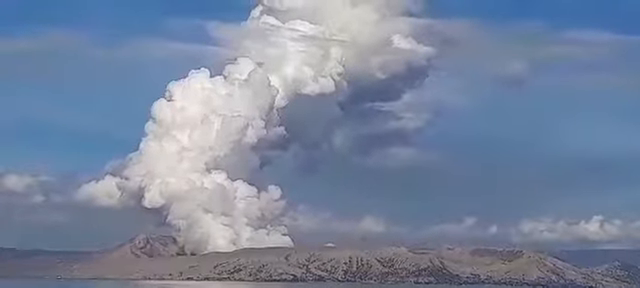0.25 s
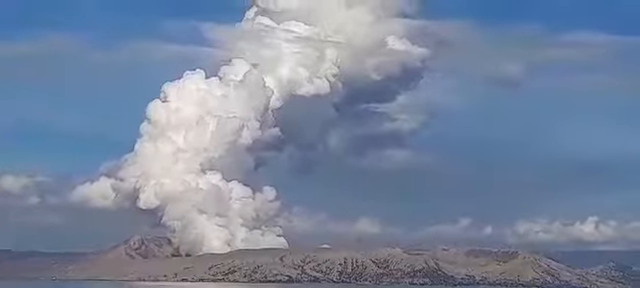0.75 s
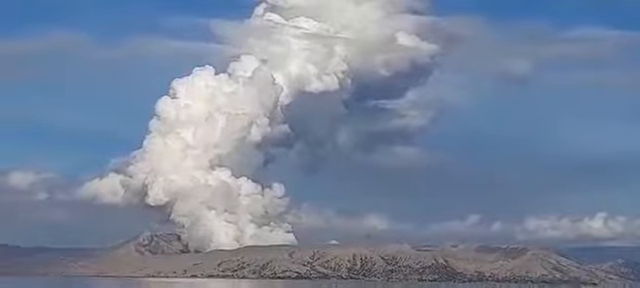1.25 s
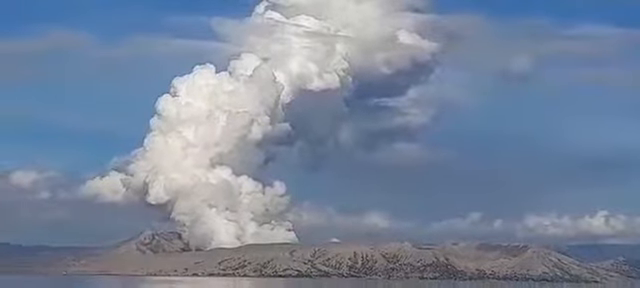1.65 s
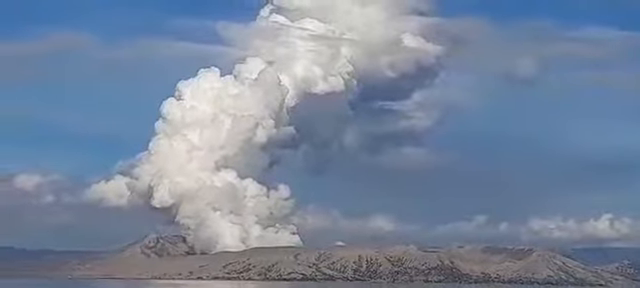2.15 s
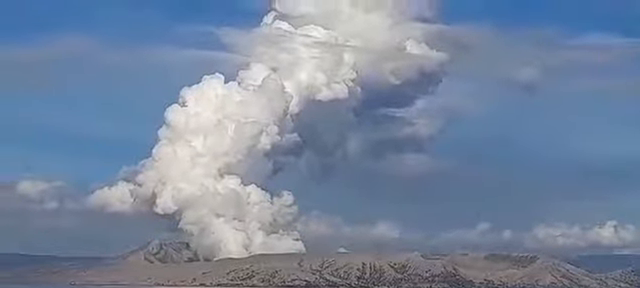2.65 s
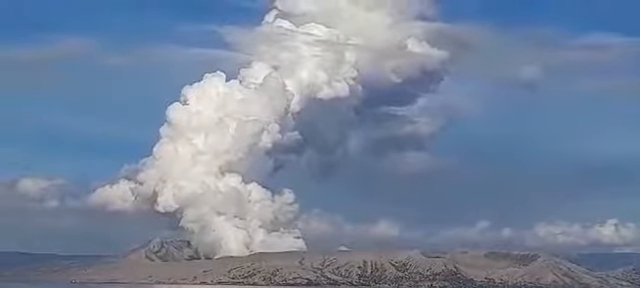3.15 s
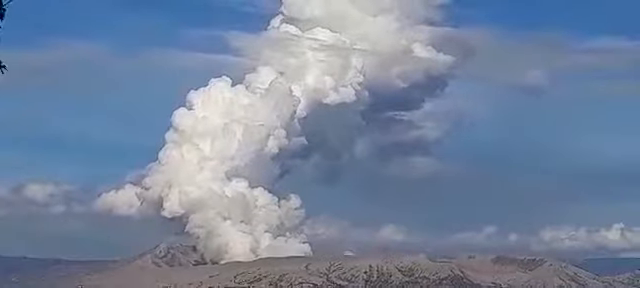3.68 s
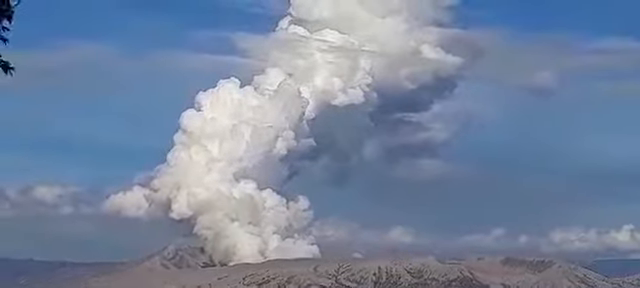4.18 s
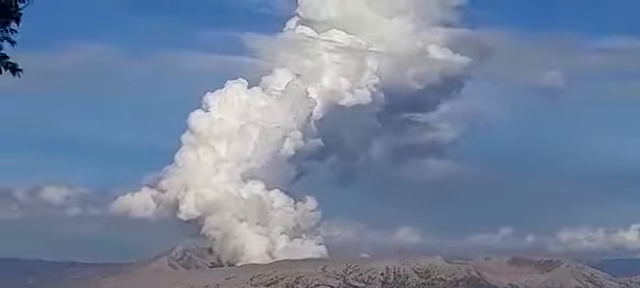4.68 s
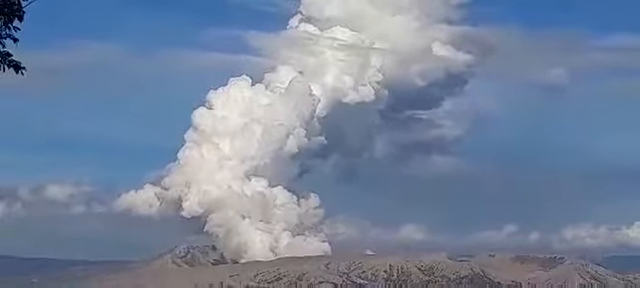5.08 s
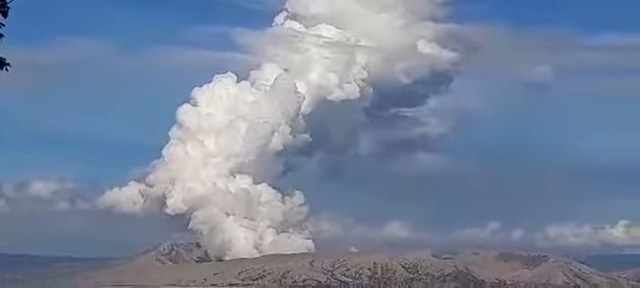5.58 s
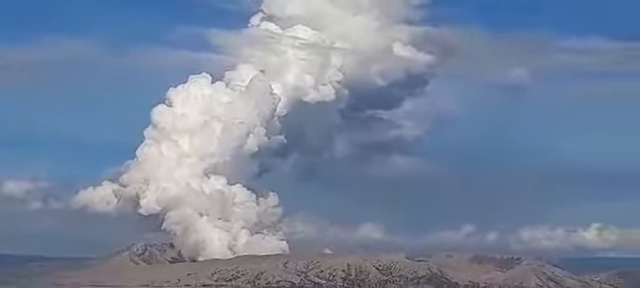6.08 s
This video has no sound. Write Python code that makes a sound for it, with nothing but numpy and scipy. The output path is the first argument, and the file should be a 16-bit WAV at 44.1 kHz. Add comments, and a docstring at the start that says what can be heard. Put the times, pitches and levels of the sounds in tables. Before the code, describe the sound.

Open outdoor place with a constant low rumble, faint hum and thin airy hiss. A small bird close to a stereo microphone gives five loud, sharp chirps, a little over a second apart, each flicking up and plunging into a rasp. Soft high ticks run between them, and distant birds whistle faintly through echoes. Two tiny snaps come early; duller, hoarser calls answer from afar later.

```python
"""A low outdoor rumble, a faint hum and a thin hiss of air run throughout, with runs of soft high ticks over them.
Far birds whistle, and a small bird near the stereo microphone gives five sharp chirps.
There are also two faint snaps and, farther away, duller rasping calls.
Bird voices are swept tones: harmonic stacks through a throat for the chirps and rasps, thin tones for
ticks and whistles, all scattered by echoes. Rumble, air and snaps are shaped noise; the hum is sines."""
import sys
import numpy as np
from scipy import signal
from scipy.fft import rfft, irfft, next_fast_len
from scipy.io import wavfile
from scipy.ndimage import map_coordinates

SR = 44100
rng = np.random.default_rng(int(sys.argv[2]) if len(sys.argv) > 2 else 0)


def materialize(psi):
    """Save the field psi as 16-bit PCM at rate SR to the path in sys.argv[1].

    A 1-D psi becomes a single channel; in a 2-D psi each row is a channel.
    """
    bounded = np.clip(np.atleast_2d(psi).T, -1, 1)
    quanta = np.round(bounded * 32767).astype(np.int16)
    wavfile.write(sys.argv[1], SR, quanta)


N = 279153  # samples

# Spectrum of the low rumble. Each row: frequency in Hz, relative density in dB per Hz.
RUMBLE_SPECTRUM = [(13, -31), (22, -61), (48, -2.5), (109, 0.5), (168, -6), (207, -13.5), (309, -10.5),
                   (380, -18.5), (557, -27.5), (1400, -42), (1820, -106), (3080, -120)]
# Likeness of the rumble at the two ports. Each row: frequency in Hz, left-right likeness (0 to 1).
PORT_LIKENESS = [(60, 0.81), (130, 0.86), (280, 0.64), (600, 0.29), (1300, 0.07)]
# Faint hum tones. Each row: frequency in Hz, level in dB before the common lift.
HUM_TONES = [(59.3, -69), (105.5, -70), (236.9, -80.5)]
# Spectrum of the open-air hiss. Each row: frequency in Hz, relative density in dB per Hz.
AIR_SPECTRUM = [(500, 1.5), (1300, -4), (2000, -1.5), (2700, 3), (3500, -7), (4700, 0), (6100, 4.5),
                (7500, -10), (8800, -13.5), (11100, 0), (13000, -8.5)]
# Runs of soft ticks. Each row: start in seconds, ticks, spacing in seconds,
# level of the first in dB before the tick throat.
TICK_RUNS = [(.015, 3, .12, -68.5), (1.074, 5, 0.078, -65.5), (1.726, 2, 0.065, -58.5),
             (1.956, 2, 0.052, -61.5), (2.223, 2, 0.051, -58), (2.379, 3, 0.082, -58.5),
             (2.82, 2, .157, -55.5), (3.214, 1, 0, -62), (5.772, 3, 0.068, -63.5), (6.055, 2, 0.22, -62.5)]
# The course of one tick. Each row: seconds from its start before stretching, nominal pitch in Hz,
# relative effort in dB.
TICK_COURSE = [(0, 6560, -14), (.006, 6350, 4), (.016, 5800, 3), (.027, 5030, -2), (.04, 4170, -5)]
# Throat of the ticking voice. Each row: frequency in Hz, gain in dB.
TICK_THROAT = [(3500, -7.5), (5000, -3), (6400, 2), (6900, -46), (9000, -24)]
# Phrases of rising whistles. Each row: start in seconds, notes, note length in seconds, top pitch in Hz,
# level in dB.
RISING_PHRASES = [(0.106, 1, 0.13, 2900, -70.5), (.85, 4, 0.18, 2880, -68), (2.82, 2, .19, 2915, -70),
                  (3.659, 1, 0.045, 1752, -69), (3.719, 1, .11, 2934, -66), (4.376, 1, .18, 2856, -69),
                  (5.409, 1, 0.15, 2550, -63.5), (5.559, 1, 0.22, 2860, -66.5)]
# Single falling whistles. Each row: start in seconds, length in seconds, start pitch in Hz, level in dB.
FALLING_WHISTLES = [(1.629, 0.06, 7650, -67), (1.95, 0.055, 7970, -74.5), (3.364, .11, 7600, -69),
                    (3.493, 0.17, 2610, -74), (4.22, .16, 2738, -63.5), (4.579, 0.064, 2505, -67.5),
                    (4.586, 0.12, 7640, -70.5), (4.779, .016, 2714, -63), (4.94, 0.073, 7820, -73.5),
                    (5.187, 0.043, 2500, -70), (5.798, .14, 2800, -66), (6.16, 0.137, 2650, -67)]
# Loud near chirps. Each row: end of the lead-in in seconds, crest in Hz before the fall exponent, length
# factor, fall steepness (exponent), level in dB, low overtones in dB, top overtones in dB.
CHIRPS = [(.471, 2536, 1.03, 1.04, -36.5, 4.5, -0.5), (1.485, 2515, 0.97, 1.1, -36, 2, 0),
          (2.664, 2767, 1.044, 1.37, -36.5, 2.5, 1.5), (4.091, 2510, 1.004, .9, -34.5, 2.5, 4),
          (5.487, 2457, 1.055, 1.09, -39, 6, -0.5)]
# Throat and beak of the near bird. Each row: frequency in Hz, gain in dB.
THROAT = [(900, -45.5), (1700, -24), (2400, -20), (3100, -6), (4150, -3), (4700, 2.5), (5600, 6),
          (6750, -2.5), (7250, -26), (8000, -28), (10000, -28.5), (11300, -17), (13000, -25.5)]
# Faint snaps. Each row: start in seconds, noise level at the start in dB before the snap's tone is applied.
SNAPS = [(0.832, -41), (0.9318, -39.5)]
# Tone of the snaps. Each row: frequency in Hz, gain in dB.
SNAP_TONE = [(700, -46), (2000, -11), (6000, -18), (13000, -41)]
# Far rasps. Each row: end of the lead-in in seconds, crest in Hz before the fall exponent, length factor,
# fall steepness (exponent), level in dB.
RASPS = [(3.868, 2317, 1.62, 1.3, -55), (4.585, 2485, 1.6, 0.95, -68), (4.981, 2510, 1.14, 0.92, -74.5),
         (6.122, 2041, 1.8, .8, -58), (6.211, 1930, 1.96, 0.7, -69)]
# Throat of the far rasps. Each row: frequency in Hz, gain in dB.
RASP_THROAT = [(1200, -17), (2300, -1), (3100, 8), (4000, 8), (4700, 2.5), (6300, -7), (7500, -24),
               (13000, -41)]
# Balance of the microphone ports. Each row: frequency in Hz, left minus right in dB.
PORT_BALANCE = [(60, -3.5), (250, -3), (700, -0.5), (2400, 1.5), (3300, -1.5), (4800, -10), (5800, -15),
                (6600, -13.5), (7200, 5), (7900, 14), (9200, -3.5), (11200, -3), (12800, -9)]

TOP_HZ = 13080  # upper band limit

# The rumble eases off slowly, wanders, and swells briefly around each loud chirp.
RUMBLE_START_DB, RUMBLE_EASE_DB_PER_S, WANDER_DB, WANDER_PER_S = -57, .5, 1.82, 7
SWELL_DB, SWELL_LAG_S, SWELL_WIDTH_S = 4.5, 0.089, .12
HUM_LIFT_DB, AIR_DB = 4.5, -71.0

TICK_SWELL_DB = 1.55  # each tick of a run over the one before

# Rising notes: the beat of a phrase, and how far below its top a note starts (share).
NOTE_PERIOD_S, RISE_SHARE = .4, .085
# One far bird repeats a low, level note at a slow beat.
LOW_FIRST_S, LOW_PERIOD_S, LOW_NOTE_S, LOW_HZ, LOW_DB = .7, 1.1, 0.29, 2050, -76.5
FALL_SHARE = 0.072  # how far a falling whistle sinks

# Chirp times are stretched by the length factor; pitch shares of the crest are raised to the fall steepness.
# Soft, unsteady lead-in: its length, pitch share, relative level, swell and jitter share.
LEAD_S, LEAD_PITCH, LEAD_DB, LEAD_SWELL_DB_PER_S, LEAD_JITTER = .032, 1.08, -5.5, 480, 0.0705
# The pitch flicks up to its crest, then plunges towards a floor.
FLICK_FROM, FLICK_S, PLUNGE_S, FLOOR_PITCH = .92, .0055, .023, .355
# The effort sets in fast, sags while it is held and is let go.
ATTACK_S, HOLD_S, RELEASE_S, SAG_DB_PER_S, RELEASE_DB = 0.002046, 0.047, 0.0097, 152, 27
ACCENT_DB, ACCENT_S = 4.5, 0.014  # the clean crest is pushed out harder than the rasp
CREST_JITTER, JITTER_GROWS = .026, 0.123  # shares: small at the crest, growing as the pitch sinks


def amp(db):
    """Decibels to gain."""
    return 10 ** (np.asarray(db) / 20)


def unit(x):
    """Scale to rms 1."""
    return x / np.sqrt(np.mean(x ** 2) + 1e-20)


def along(points, hz):
    """Read a curve of (Hz, value) points on a log frequency axis."""
    f, v = np.transpose(points)
    return np.interp(np.log(hz + 1), np.log(f + 1), v)


def wobble(rate, size):
    """A smooth random curve with rate knots a second."""
    knots = rng.standard_normal(int(size * rate / SR) + 4)
    return map_coordinates(knots, [np.arange(size) * rate / SR])


def filtered(x, response):
    """Multiply the spectrum of x by a response of frequency."""
    m = next_fast_len(N + SR // 2)
    return irfft(rfft(x, m) * response(np.fft.rfftfreq(m, 1 / SR)), m)[..., :N]


def add(out, s, sound):
    """Mix a stereo sound in at time s."""
    start = max(round(s * SR), 0)
    out[:, start:start + sound.shape[1]] += sound[:, :max(N - start, 0)]


def beats(start, period, count):
    """The times of evenly repeated notes."""
    return start + period * np.arange(round(count))


def scatter(call, direct, build, near_t60, tail_db, tail_t60):
    """A call at one port: the straight path, a cluster of wall and leaf echoes, and a longer diffuse tail."""
    t = np.arange(SR * 3 // 4) / SR
    chance = rng.random(len(t))
    size = rng.standard_normal(len(t))
    haze = rng.standard_normal(len(t))
    growth = 1 - np.exp(-t / build)
    # about 1500 separate echoes a second
    echoes = (chance < 1500 / SR) * size * growth * amp(-60 * t / near_t60)
    tail = haze * growth * amp(-60 * t / tail_t60)
    paths = echoes / np.linalg.norm(echoes) + amp(tail_db) * tail / np.linalg.norm(tail)
    paths[0] += direct
    heard = signal.fftconvolve(call, paths)
    # scattering spreads the call without changing its energy
    return heard * np.linalg.norm(call) / np.linalg.norm(heard)


def both_ports(call, **place):
    """The two ports hear the same kind of place through independent echoes."""
    return np.array([scatter(call, **place) for _ in range(2)])


def rumble(t):
    """Low noise, nearly alike at both ports in the bass and less alike higher up, with a drifting level."""
    def mid_side(hz):
        angle = np.arccos(np.clip(along(PORT_LIKENESS, hz), -1, 1)) / 2
        return amp(along(RUMBLE_SPECTRUM, hz)) * [np.cos(angle), np.sin(angle)]

    mid, side = filtered(rng.standard_normal((2, N)), mid_side)
    swells = sum(np.exp(-((t - s - SWELL_LAG_S) / SWELL_WIDTH_S) ** 2) for s, *_ in CHIRPS)
    level_db = RUMBLE_START_DB - RUMBLE_EASE_DB_PER_S * t + SWELL_DB * swells
    level_db = level_db + WANDER_DB * wobble(WANDER_PER_S, N)
    return unit(np.array([mid + side, mid - side])) * amp(level_db)


def hum(t):
    """Steady low sines whose phases waver slowly."""
    return sum(amp(db + HUM_LIFT_DB) * np.sin(2 * np.pi * hz * t + 0.44 * wobble(2.91, N))
               for hz, db in HUM_TONES)


def air():
    """A thin hiss of open air: independent shaped noise at each port, its level wavering slightly."""
    hiss = unit(filtered(rng.standard_normal((2, N)), lambda hz: amp(along(AIR_SPECTRUM, hz))))
    return hiss * amp(AIR_DB + 0.44 * wobble(4.23, N))


def background():
    """The outdoor bed: broadband rumble and air noise around a few steady tones."""
    t = np.arange(N) / SR
    return rumble(t) + hum(t) + air()


def tick_course(stretch):
    """Pitch in Hz and effort in dB of one tick, sample by sample."""
    s, *columns = np.transpose(TICK_COURSE)
    t = np.arange(s[0] * stretch, s[-1] * stretch, 1 / SR) / stretch
    return [np.interp(t, s, column) for column in columns]


def ticking():
    """Soft ticks, each one quick, scratchy downward sweep of a thin tone, blurred by its echoes."""
    out = np.zeros((2, N))
    for start, notes, spacing, first_db in TICK_RUNS:
        for k, s in enumerate(beats(start, spacing, count=notes)):
            hz, effort_db = tick_course(1 + 0.35 * rng.uniform(-1, 1))
            # pitch scratch grows through the tick
            scratch = np.linspace(.035, .07, len(hz)) * wobble(1400, len(hz))
            hz = hz * (1 + 0.0119 * rng.standard_normal() + scratch)
            tone = amp(effort_db) * np.sin(2 * np.pi * np.cumsum(hz) / SR)
            call = amp(first_db + TICK_SWELL_DB * k) * unit(tone)
            add(out, s, both_ports(call, direct=0.53, build=0.0021, near_t60=0.38,
                                   tail_db=-2.0, tail_t60=0.72))
    return filtered(out, lambda hz: amp(along(TICK_THROAT, hz)))


def far_whistles():
    """Burry rising, level and falling tones of far birds, mostly echo by the time they arrive."""
    rising = [(s, length, hz * (1 - RISE_SHARE), hz, db)
              for start, notes, length, hz, db in RISING_PHRASES
              for s in beats(start, NOTE_PERIOD_S, count=notes)]
    level = [(s, LOW_NOTE_S, LOW_HZ, LOW_HZ, LOW_DB)
             for s in beats(LOW_FIRST_S, LOW_PERIOD_S, count=3)]
    falling = [(s, length, hz, hz * (1 - FALL_SHARE), db) for s, length, hz, db in FALLING_WHISTLES]
    out = np.zeros((2, N))
    for s, length, start_hz, end_hz, db in rising + level + falling:
        u = np.linspace(0, 1, int(length * SR))
        burr = min(.055 * start_hz, 260) * wobble(550, len(u))  # fast random pitch deviation in Hz
        hz = start_hz + (end_hz - start_hz) * np.sin(u * np.pi / 2) + burr
        tone = signal.windows.tukey(len(u), .3) * np.sin(2 * np.pi * np.cumsum(hz) / SR)
        add(out, s, both_ports(amp(db) * unit(tone), direct=0.45, build=0.003, near_t60=0.66,
                               tail_db=-5.5, tail_t60=1.2))
    return out


def chirp_course(stretch, fall):
    """Pitch (share of the crest), effort dB and jitter share of one chirp: lead-in, flick, plunge."""
    t = np.arange(-LEAD_S * stretch, (HOLD_S + RELEASE_S) * stretch, 1 / SR) / stretch
    flick = np.interp(t, [0, FLICK_S], [FLICK_FROM, 1])
    plunge = FLOOR_PITCH + (1 - FLOOR_PITCH) * np.exp(-np.maximum(t - FLICK_S, 0) / PLUNGE_S)
    accent_db = ACCENT_DB * np.exp(-(t / ACCENT_S) ** 2)
    release_db = RELEASE_DB * np.maximum(t - HOLD_S, 0) / RELEASE_S
    effort_db = accent_db - SAG_DB_PER_S * t - release_db
    voiced = np.clip(1 + t / ATTACK_S, 0, 1)  # 0 in the lead-in, 1 in the chirp proper

    def blend(lead, call):
        return lead + voiced * (call - lead)

    pitch = blend(LEAD_PITCH, flick * plunge) ** fall
    level_db = blend(LEAD_DB + LEAD_SWELL_DB_PER_S * t, effort_db)
    jitter = blend(LEAD_JITTER, CREST_JITTER + JITTER_GROWS * (1 - plunge))
    return pitch, level_db, jitter


def syrinx(crest_hz, stretch, fall, throat, hoarse, low_db, top_db):
    """A harmonic stack flicks up clean and plunges into a rasp, its overtones sweeping through the throat."""
    pitch, db, jitter = chirp_course(stretch, fall)
    hz = crest_hz * pitch
    phase = 2 * np.pi * np.cumsum(hz * (1 + (jitter + hoarse) * wobble(1500, len(hz)))) / SR
    k = np.arange(1, 10)[:, None]  # harmonic number
    # the fundamental is weak, and harmonics above the fifth are progressively weaker
    source_db = -7 * (k == 1) - 1.4 * np.maximum(k - 5, 0)
    stack = np.sum(amp(source_db) * (k * hz < SR / 2) * np.sin(k * phase), 0)
    flutter_db = 3 * wobble(600, len(hz))
    voice = amp(db + flutter_db) * stack
    f = np.fft.rfftfreq(len(hz), 1 / SR)
    # the opening of the beak tilts the low and top overtones
    gape_db = along([(3200, low_db), (4500, 0), (7500, 0), (10500, top_db)], f)
    return unit(irfft(rfft(voice) * amp(along(throat, f) + gape_db), len(hz)))


def near_bird():
    """Loud chirps: the left port hears more of the straight path, the right more of the echoes."""
    out = np.zeros((2, N))
    for s, crest_hz, stretch, fall, db, low_db, top_db in CHIRPS:
        call = amp(db) * syrinx(crest_hz, stretch, fall, THROAT, 0, low_db, top_db)
        left = scatter(call, direct=0.42, build=0.014, near_t60=0.12, tail_db=-6.0, tail_t60=0.46)
        right = scatter(call, direct=0.3, build=0.0094, near_t60=0.21, tail_db=-14.5, tail_t60=0.65)
        add(out, s - LEAD_S * stretch, np.array([left, right]))
    return out


def snaps():
    """Two tiny soft snaps: bursts of shaped noise, falling 60 dB in 0.2 s."""
    out = np.zeros((2, N))
    t = np.arange(SR // 4) / SR
    for s, db in SNAPS:
        add(out, s, amp(db - 60 * t / .2) * rng.standard_normal((2, len(t))))
    return filtered(out, lambda hz: amp(along(SNAP_TONE, hz)))


def far_rasps():
    """Duller, hoarser and longer calls from farther away, from the same kind of voice through another throat."""
    out = np.zeros((2, N))
    for s, crest_hz, stretch, fall, db in RASPS:
        call = amp(db) * syrinx(crest_hz, stretch, fall, RASP_THROAT, hoarse=.03, low_db=0, top_db=0)
        heard = both_ports(call, direct=0.47, build=0.0012, near_t60=0.2, tail_db=1.0, tail_t60=0.99)
        add(out, s - LEAD_S * stretch, heard)
    return out


def scene():
    """All the birds and the snaps over the background."""
    return background() + ticking() + far_whistles() + near_bird() + snaps() + far_rasps()


def record(dry):
    """The two microphone ports colour the sound differently, the right stronger near 6 kHz; then a band limit."""
    def ports(hz):
        # half of the difference goes to each side
        return amp(np.outer([.5, -.5], along(PORT_BALANCE, hz)))

    return filtered(dry, lambda hz: ports(hz) * (hz < TOP_HZ))


dry = scene()
out = record(dry)
materialize(out)
```